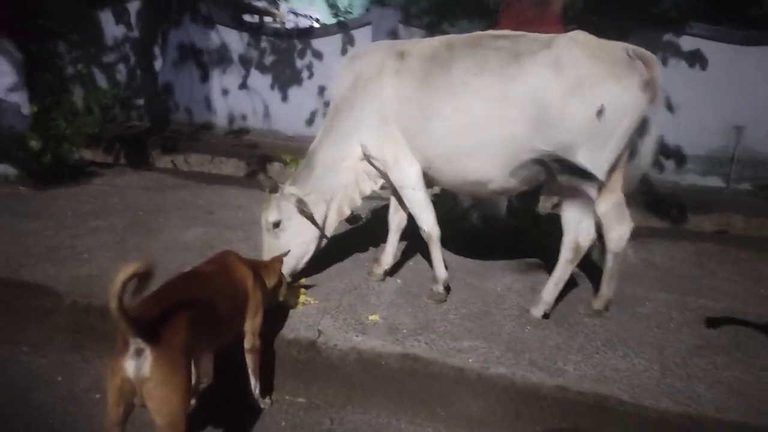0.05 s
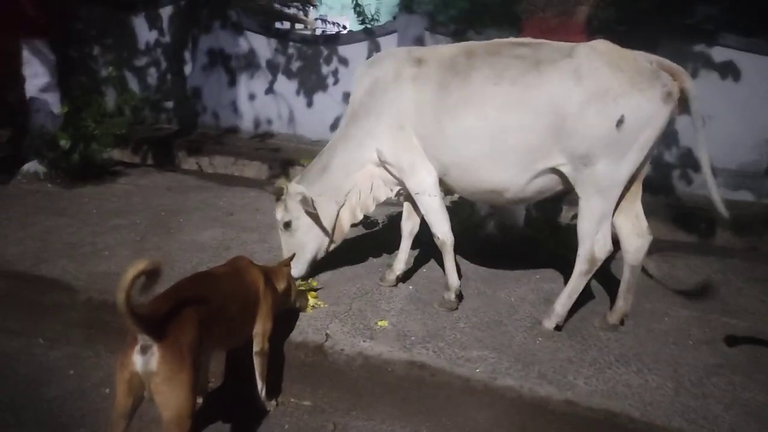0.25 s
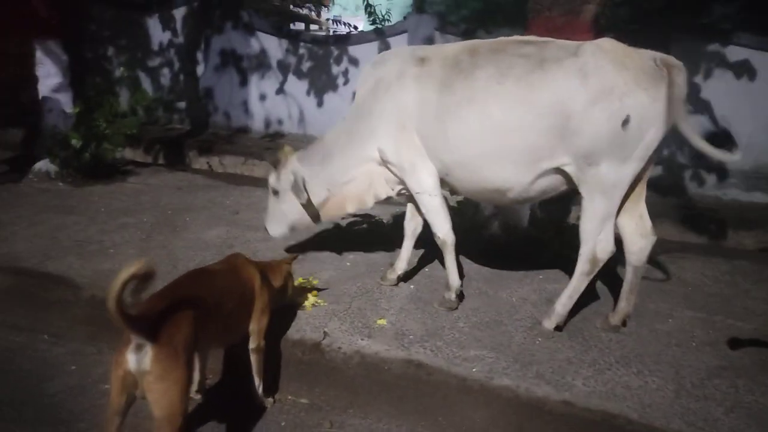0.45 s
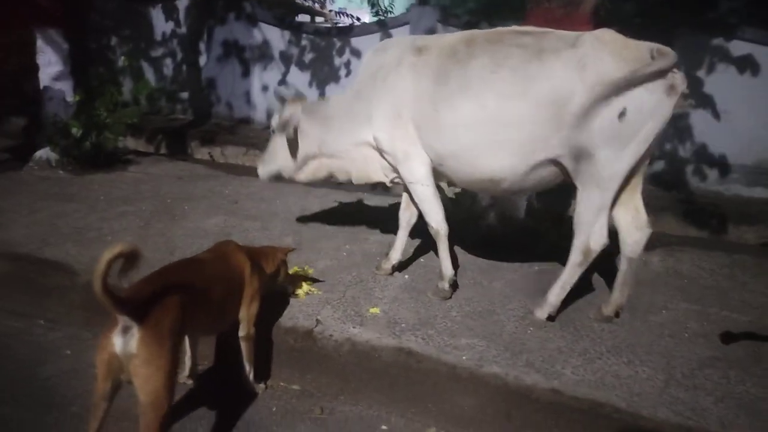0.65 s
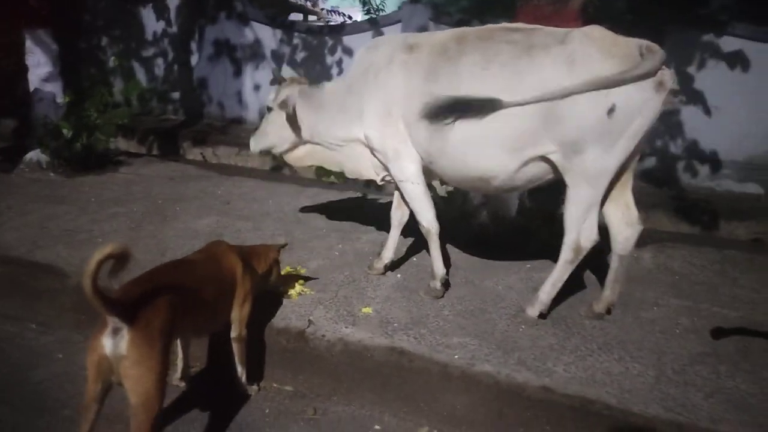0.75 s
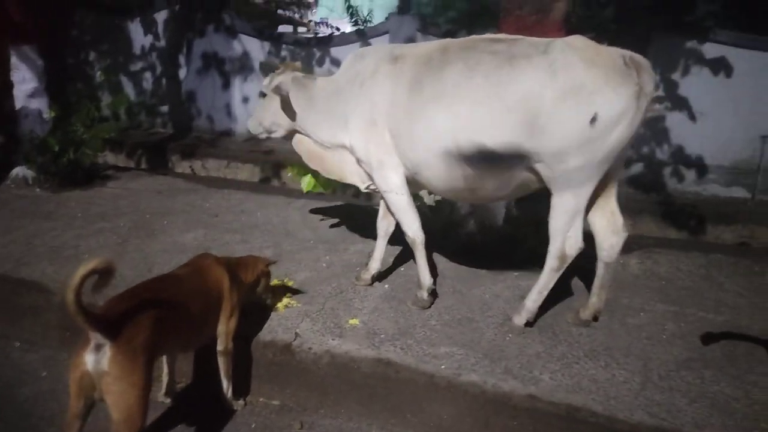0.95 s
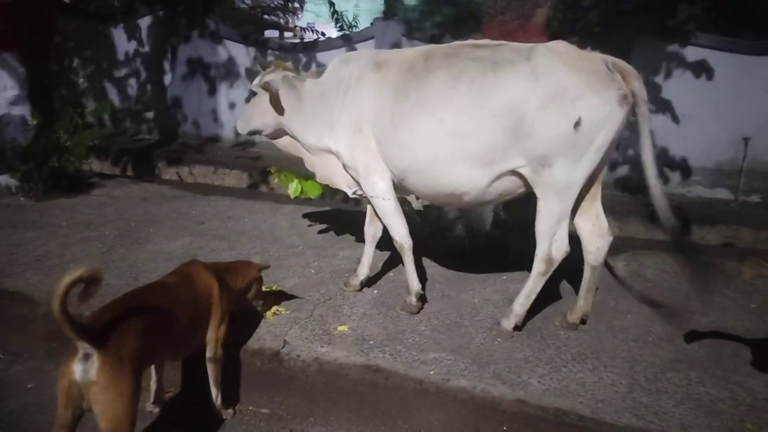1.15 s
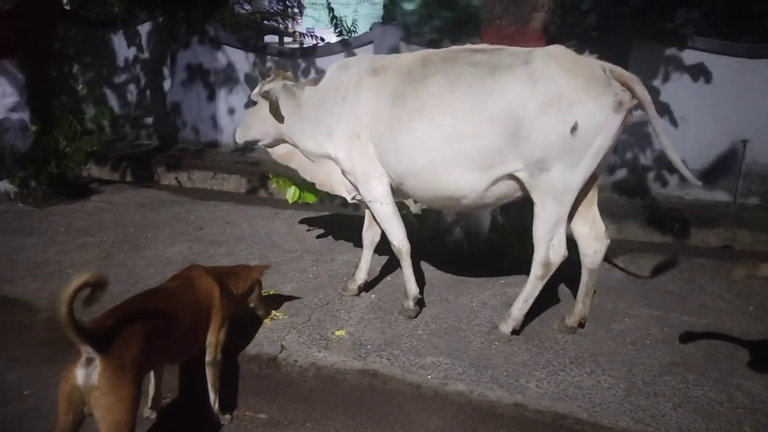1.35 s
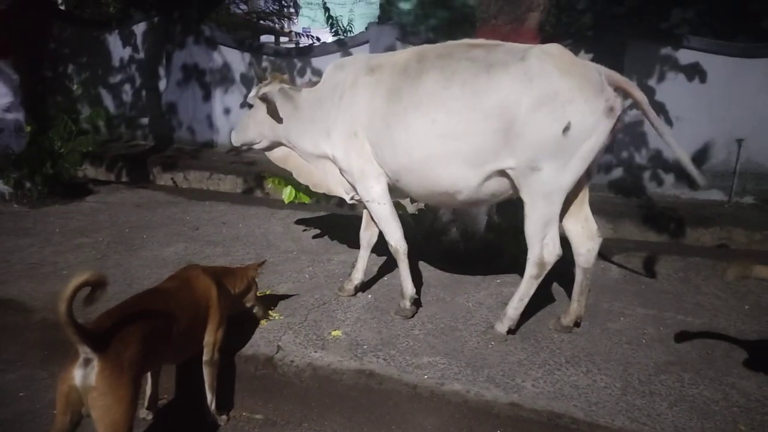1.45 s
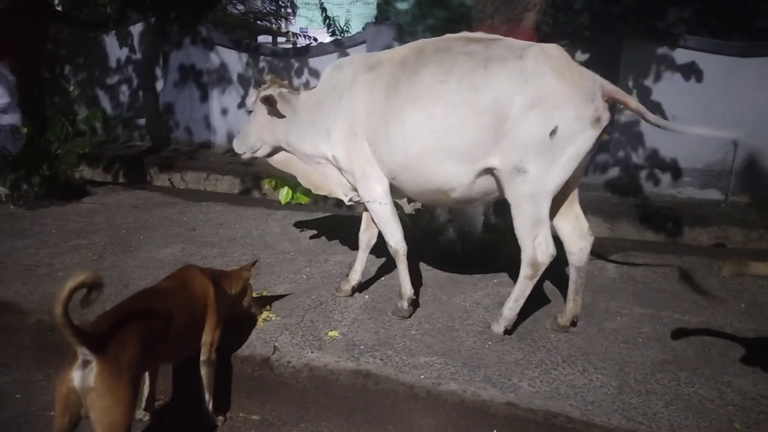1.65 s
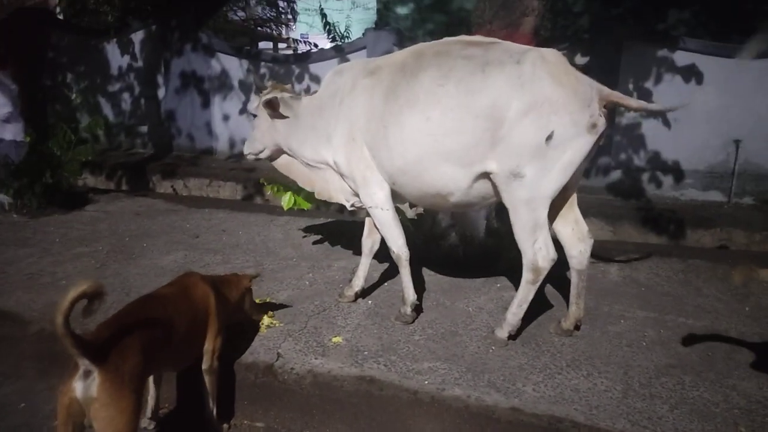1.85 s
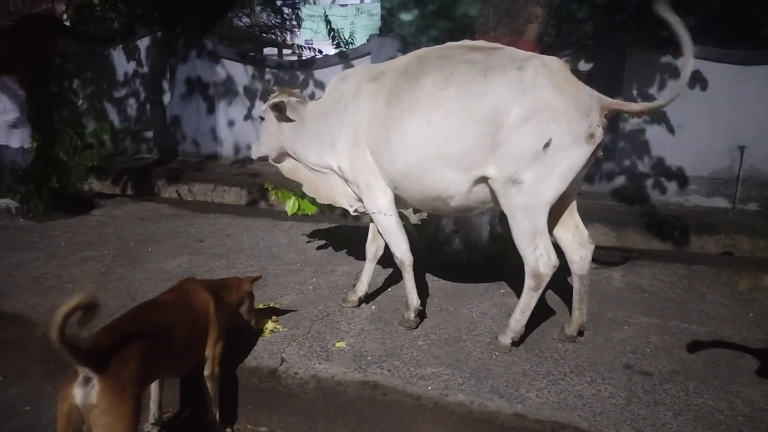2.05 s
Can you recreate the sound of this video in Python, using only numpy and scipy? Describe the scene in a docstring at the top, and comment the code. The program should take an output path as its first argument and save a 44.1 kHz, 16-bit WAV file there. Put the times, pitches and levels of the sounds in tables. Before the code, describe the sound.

On a quiet night street, a nearby dog lets out a single sharp bark that rings briefly and fades. Afterwards there are only faint gritty steps and a dull hoof scrape over steady distant rumble and insects.

```python
"""A faint scuff and a soft smack of jaws, then a dog gives one short, loud bark on a night street.
The bark is the buzz of its vocal folds and rough breath, shaped by the throat as the mouth opens.
The road and walls throw the sound back, and the street rings briefly. Feet crunch on grit and a hoof
scrapes, over a low town rumble, a faint hum and the hiss of insects."""
import sys
import numpy as np
from scipy import signal
from scipy.fft import rfft, irfft
from scipy.io import wavfile
from scipy.ndimage import uniform_filter1d, minimum_filter1d

SR = 44100
rng = np.random.default_rng(int(sys.argv[2]) if len(sys.argv) > 2 else 0)


def file_out(sig):
    """Save sig as 16-bit WAV at sys.argv[1]."""
    # one column per channel
    cols = np.atleast_2d(sig).T
    # limit, then scale
    lim = np.clip(cols, -1, 1)
    pcm = np.round(lim * 32767).astype(np.int16)
    wavfile.write(sys.argv[1], SR, pcm)


N = 92610
TIME = np.arange(N) / SR
FREQS = np.fft.rfftfreq(N, 1 / SR)
EAR_LAG_MS = 0.2  # the dog's sound reaches the left side first

# How the bark's pitch rises and falls: t/s, f/Hz
BARK_PITCH = [(.233, 255), (.245, 283.1), (.255, 314.8), (.267, 335.8), (.279, 358), (.297, 348),
              (.318, 305), (.338, 255), (.35, 145), (.38, 120)]
# How the open throat and mouth shape the voice: f/Hz, level/dB
THROAT_TONE = [(50, -38), (170, -15.5), (330, -12), (450, -8), (560, -3.5), (670, 0.5), (820, -1.5),
               (1000, -2.5), (1270, -1), (1480, -10), (1850, -11.5), (2200, -24), (2650, -18),
               (2950, -25.5), (3480, -15), (4000, -30.5), (4600, -49), (5350, -34.5), (7500, -37.5),
               (12000, -47.5), (15000, -62)]
# Where the throat rings on after each pulse: f/Hz, width/Hz
THROAT_RINGS = [(700, 220), (1230, 96), (3520, 350)]


def bark():
    """Uneven pulses of the vocal folds and puffs of air pass the throat as the mouth opens and shuts."""
    start_s, rise_s, hold_s, fall_s = .2355, .013, .05, .043
    bark_db, sag_db, end_db = -9.5, -3.5, -27
    jitter, shimmer, alternation = 0.027, 0.28, 0.33  # uneven pitch, uneven strength, strong-weak pulses
    stages = start_s + np.cumsum([0, rise_s, hold_s, fall_s])
    pitch = np.interp(TIME, *np.transpose(BARK_PITCH)) * (1 + jitter * wander(rate_hz=180))
    cycles = np.cumsum(pitch) / SR
    folds = unit(sum(np.cos(2 * np.pi * k * cycles) for k in range(1, 20)))
    folds *= 1 + shimmer * wander(rate_hz=183) + alternation * np.cos(np.pi * cycles)
    puffs = unit((.5 + np.exp(-(cycles % 1) / 0.35)) * rng.standard_normal(N))
    air_share = np.interp(TIME, stages[:3], [.9, .5, .75])
    buzz = np.sqrt(1 - air_share) * folds + np.sqrt(air_share) * puffs
    for hz, width in THROAT_RINGS:
        buzz = buzz - 2 * resonate(buzz, hz, width)
    effort = np.clip((TIME - start_s) / rise_s, 0, 1) ** 1.4
    effort *= amp(np.interp(TIME, stages, [0, 0, sag_db, end_db]))
    effort *= np.exp(-np.maximum(TIME - stages[-1], 0) / .008)
    opening = np.interp(TIME, stages, [0, 1, 1, 0])
    wide = colour(buzz, THROAT_TONE)
    narrow = colour(buzz, [(hz * 0.93, db) for hz, db in THROAT_TONE])  # a closing mouth rings lower
    voice = (opening * wide + (1 - opening) * narrow)[0] * effort
    voice *= amp(bark_db) * np.linalg.norm(effort) / np.linalg.norm(voice)
    # The soft, lowest tone of the voice starts sooner and lasts longer.
    chest_db, lead_s, chest_s = -32.5, 0.0031, 0.14
    swell = np.sin(np.pi * np.clip((TIME - start_s + lead_s) / chest_s, 0, 1))
    return voice + amp(chest_db) * np.sin(2 * np.pi * cycles) * abs(swell) ** 0.36


# Near echoes off the road, a cow and walls: left delay/ms, right delay/ms, level/dB
NEAR_ECHOES = [(3.1, 2.77, -19.5), (9.4, 12, -11.5), (15.0, 13, -12)]
# How the street shapes its far echoes: f/Hz, level/dB
ECHO_TONE = [(100, 14), (200, 2.5), (330, 4), (430, 9), (560, -2.5), (710, -2), (850, 0), (1050, -5),
             (1300, -1.5), (1700, 1), (2700, 3), (3500, -1.5), (4200, 7), (8000, -0.5)]
# How long the street rings: f/Hz, time to fade by 60 dB/s
STREET_FADE = [(100, 2.3), (400, 0.98), (720, 1.17), (1300, 0.72), (3500, 1.23), (8000, 0.15)]
# Echoes off far walls: delay/s, level/dB, time to fade by 60 dB/s
FAR_WALLS = [(0.084, -20, .27), (0.159, -24, 0.21), (.37, -37, .5)]


def street(x):
    """A sound arrives directly, then bounces off near and far surfaces until it dies away."""
    near = delayed(x, [0, EAR_LAG_MS])
    near += sum(amp(db) * delayed(x, [left, right]) for left, right, db in NEAR_ECHOES)
    near += amp(-9) * ring(x, [(1000, 0.075)], delay_s=.004)  # scattered by kerb and wall
    thrown = colour(x, ECHO_TONE)
    tail = amp(-21.5) * ring(thrown, STREET_FADE, delay_s=.035)
    walls = sum(amp(db) * ring(thrown, [(1000, fade)], delay) for delay, db, fade in FAR_WALLS)
    return near + tail + walls


# Smacks of the jaws before the bark: t/s, relative level/dB, f/Hz, width/Hz, decay/s
JAW_SMACKS = [(.126, -39.5, 231, 70, 0.0067), (0.14, -34.5, 220, 70, 0.0066), (.128, -49, 1040, 700, 0.037),
              (0.1405, -38.5, 1200, 1190, 0.0079), (0.1549, -29, 1463, 220, 0.0034),
              (0.1534, -36, 890, 180, 0.0038), (.196, -44.5, 675, 200, 0.0014)]


def jaws():
    """Short wet knocks make the mouth ring as it opens."""
    return sum(amp(db) * burst(start, 0.0025, decay) * band(rng.standard_normal(N), hz, width)
               for start, db, hz, width, decay in JAW_SMACKS)


def thump():
    """A short low thump as the bark peaks, mostly on the left."""
    start_s, hz = .249, 55
    tone = np.sin(2 * np.pi * hz * (TIME - start_s))
    return amp(-40) * burst(start_s, rise=.004, decay=0.0063) * tone * amp([[0], [-14]])


# Grit crunching under feet: t/s, level/dB, f/Hz, decay/s
CRUNCHES = [(0.017, -45, 1260, 0.0035), (0.044, -43, 3440, 0.0035), (.053, -48, 4860, 0.013),
            (0.144, -45, 3200, 0.0051), (0.612, -48, 2940, 0.0029), (0.706, -48.5, 5000, 0.018),
            (0.79, -45.5, 1000, 0.0056), (0.904, -53.5, 9400, 0.02), (1.043, -54, 2500, 0.0075),
            (1.053, -50, 4100, 0.016), (1.078, -50, 1570, 0.011), (1.388, -55.5, 3500, 0.037),
            (1.471, -51, 3160, 0.019), (1.56, -49.5, 2600, 0.013), (1.649, -46.5, 1420, 0.016),
            (1.856, -51, 4500, .005), (1.966, -50.5, 2800, .005)]
# Dull scrapes of a hoof on the road: t/s, level/dB, rise/s, decay/s
HOOF_SCRAPES = [(0, -48.5, 0.0082, 0.085), (1.623, -47, 0.085, 0.12)]
# The lows and highs of a scrape: f/Hz, relative level/dB
HOOF_TONE = [(80, -23.5), (300, -2.5), (600, -4.5), (950, -2.5), (1300, -14), (2500, -20.5), (5000, -24.5),
             (14000, -49)]


def feet():
    """Grains of grit crack under the feet, and a hoof drags on the asphalt."""
    grains = air() * amp(2.1 * wander(rate_hz=300))
    grit = sum(amp(db) * burst(start, 0.0006, decay) * unit(resonate(grains, hz, width_hz=0.57 * hz))
               for start, db, hz, decay in CRUNCHES)
    drag = sum(amp(db) * burst(start, rise, decay) for start, db, rise, decay in HOOF_SCRAPES)
    rubbing = air() * amp(1.9 * wander(rate_hz=170))
    return grit + drag * unit(colour(rubbing, HOOF_TONE))


# The town's rumble and hiss: f/Hz, relative level/dB
TOWN_TONE = [(20, -13), (45, -15), (85, -1), (130, 2), (200, 2), (270, 1.5), (350, 0.5), (450, -5.5),
             (800, -10.5), (1300, -13.5), (2100, -19.5), (4200, -19), (5400, -43), (8000, -28.5),
             (12000, -24.5), (14500, -28.5), (16000, -35)]


def town():
    """A low rumble with a little hiss, its loudness fluttering slightly."""
    return amp(-52) * unit(colour(air(), TOWN_TONE)) * amp(0.27 * wander(rate_hz=24))


# The tones of the hum: f/Hz, level/dB
HUM_TONES = [(96.9, -63.5), (193.8, -58.5), (333.8, -62)]


def hum():
    """Three faint low tones waver in pitch and loudness."""
    total = np.zeros(N)
    for hz, db in HUM_TONES:
        cycles = np.cumsum(hz + 3 * wander(rate_hz=7.6)) / SR
        total += amp(db) * unit(np.sin(2 * np.pi * cycles) * (1 + .5 * wander(rate_hz=9.7)))
    return total


def rustle():
    """A faint, bright noise that flickers unevenly."""
    hiss = resonate(air(), 5080, width_hz=5600)
    flicker_db = 3 * wander(rate_hz=27) + 1.3 * wander(rate_hz=390)
    return amp(-61.5) * unit(hiss * amp(flicker_db))


def insects():
    """Far insects blend into one thin, high, trembling hiss."""
    return amp(-56.5) * band(air(), 6673, width_hz=928) * amp(2.47 * wander(rate_hz=13.5))


# How alike left and right sound: f/Hz, likeness (1 = the same, 0 = unrelated)
SIDE_LIKENESS = [(50, 1), (250, 0.8), (500, 0.5), (800, 0.72), (1100, -.1), (3300, 0), (4200, 0.6),
                 (5200, 0), (15000, 0.18)]


def air():
    """Even hiss that reaches the left and right sides from all around."""
    left, other = rfft(rng.standard_normal((2, N)))
    same = read(SIDE_LIKENESS, FREQS)
    right = same * left + np.sqrt(1 - same ** 2) * other
    return irfft(np.array([left, right]), N)


def amp(db):
    """Turns decibels into a number to multiply by."""
    return 10 ** (np.asarray(db) / 20)


def unit(x):
    """Scales a sound to an average strength (rms) of 1."""
    return x / np.sqrt(np.mean(x ** 2) + 1e-20)


def read(points, hz):
    """Reads between a table's rows, with frequencies spaced like musical notes."""
    f, value = np.transpose(points)
    return np.interp(np.log(hz + 1), np.log(f + 1), value)


def colour(x, points):
    """Turns lows and highs up or down by a table; nothing rings before the sound itself."""
    size = 8192
    log_gain = np.log(amp(read(points, abs(np.fft.fftfreq(size, 1 / SR)))))
    taps = np.fft.ifft(np.exp(np.conj(signal.hilbert(log_gain)))).real[:size // 2]
    return signal.fftconvolve(np.atleast_2d(x), taps[None], axes=1)[:, :N]


def wander(rate_hz):
    """A smooth random wobble of strength 1; a higher rate wobbles faster."""
    return unit(irfft(rfft(rng.standard_normal(N)) * np.exp(-(FREQS / rate_hz) ** 2), N))


def resonate(x, hz, width_hz):
    """Makes a sound ring at one frequency; a smaller width rings longer."""
    turn, feedback = np.exp(2j * np.pi * hz * TIME), np.exp(-np.pi * width_hz / SR)
    return 2 * (turn * signal.lfilter([1 - feedback], [1, -feedback], x / turn + 1e-18)).real


def band(x, hz, width_hz):
    """Rings a sound twice to narrow it further, then scales it to strength 1."""
    return unit(resonate(resonate(x, hz, width_hz), hz, width_hz))


def burst(start, rise, decay):
    """A loudness shape: a straight rise, then a fading tail."""
    age = TIME - start
    return np.clip(age / rise, 0, 1) * np.exp(-np.maximum(age - rise, 0) / decay)


def delayed(x, ms):
    """One copy of a sound for each delay."""
    return irfft(rfft(x) * np.exp(-2j * np.pi * np.outer(ms, FREQS) / 1000), N)


def ring(x, fade_times, delay_s):
    """Many echoes blur into a tail that starts after a delay and fades as the table says."""
    hz, t, bands = signal.stft(air(), SR, nperseg=256)
    fade = amp(-60 * t / read(fade_times, hz)[:, None])
    tail = signal.istft(bands * fade, SR, nperseg=256)[1][:, :N]
    tail = np.pad(unit(tail) / np.sqrt(N), ((0, 0), (round(delay_s * SR), 0)))
    return signal.fftconvolve(np.atleast_2d(x), tail, axes=1)[:, :N]


def scene():
    """The dog in the street, the feet and the night around them."""
    smack = jaws()
    dog = street(bark() + amp(-5.5) * smack)
    dog += 0.7 * delayed(smack, [0, EAR_LAG_MS])  # most of the smack arrives without an echo
    return dog + thump() + feet() + town() + hum() + rustle() + insects()


# How much louder the microphone's left side is than its right: f/Hz, level/dB
MIC_BALANCE = [(100, 0), (700, 1), (2000, -3), (7000, -0.5), (8500, 12), (10300, -10.5), (12400, -12.5),
               (13500, -2.5)]


def record(dry):
    """The microphone tints each side, quickly turns down loud peaks and cuts the very highest sounds."""
    ceiling, smooth_s, top_hz = .68, .003, 15300
    balance_db = read(MIC_BALANCE, FREQS)
    sides = irfft(rfft(dry) * amp(np.array([balance_db, -balance_db]) / 2), N)
    span = round(smooth_s * SR)
    gain = minimum_filter1d(ceiling / np.maximum(abs(sides).max(0), ceiling), span)
    sides *= uniform_filter1d(uniform_filter1d(gain, span), span)
    treble_cut = signal.firwin(511, top_hz, window=("kaiser", 9), fs=SR)
    return signal.oaconvolve(sides, treble_cut[None], "same")


dry = scene()
out = record(dry)
file_out(out)
```